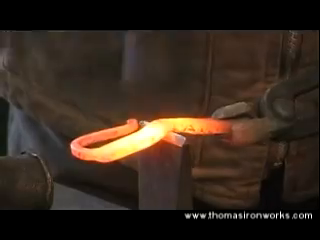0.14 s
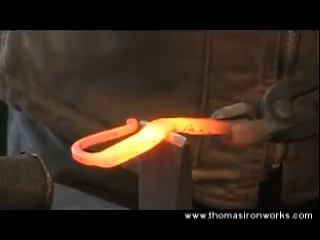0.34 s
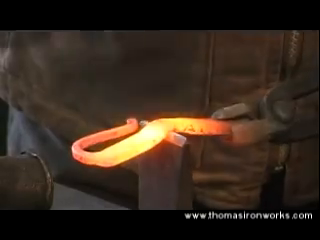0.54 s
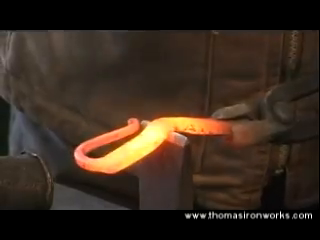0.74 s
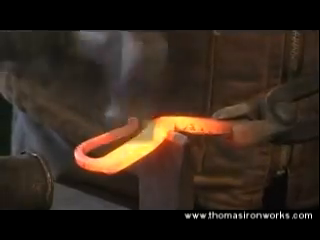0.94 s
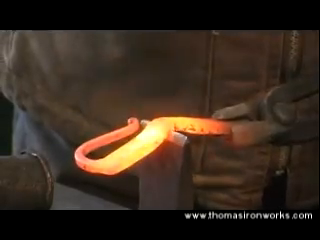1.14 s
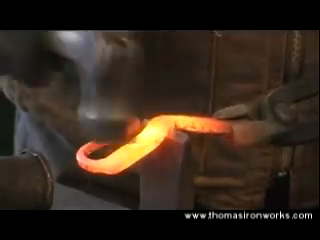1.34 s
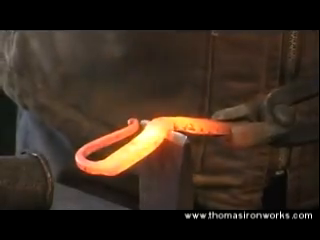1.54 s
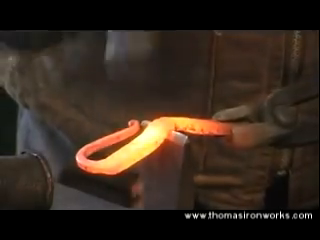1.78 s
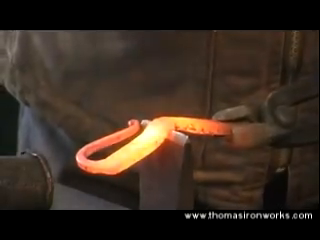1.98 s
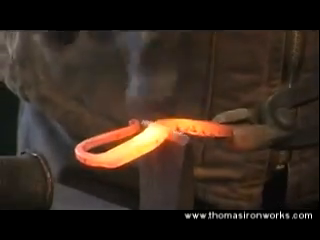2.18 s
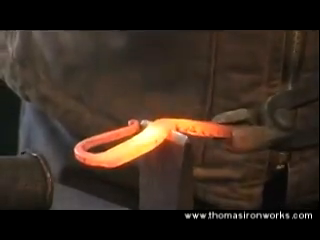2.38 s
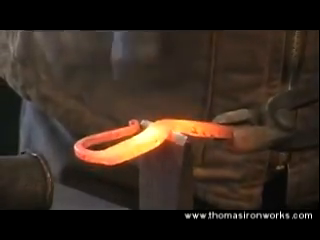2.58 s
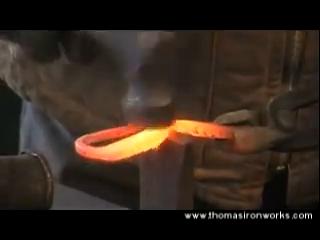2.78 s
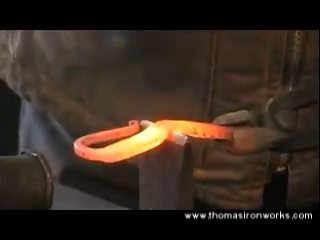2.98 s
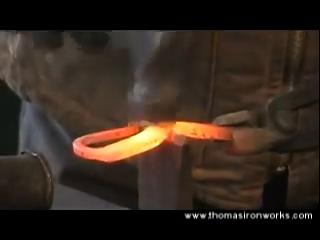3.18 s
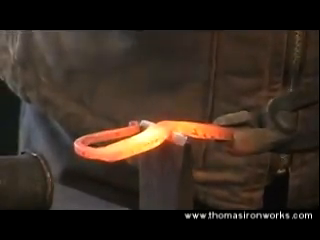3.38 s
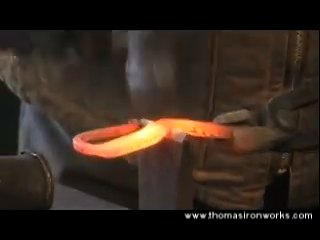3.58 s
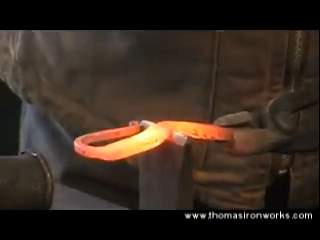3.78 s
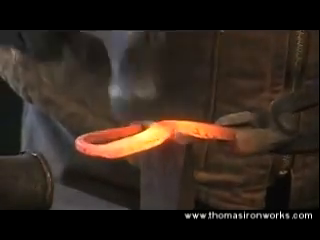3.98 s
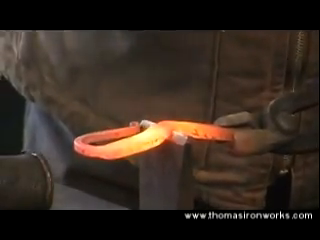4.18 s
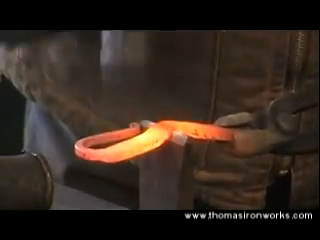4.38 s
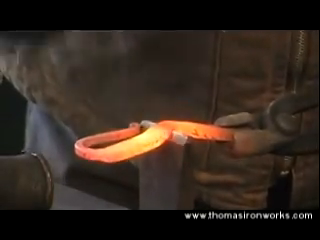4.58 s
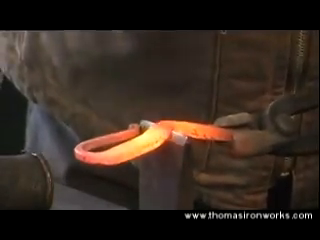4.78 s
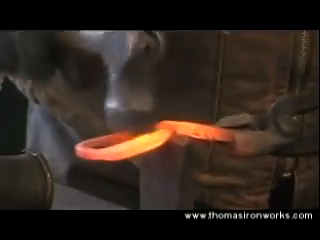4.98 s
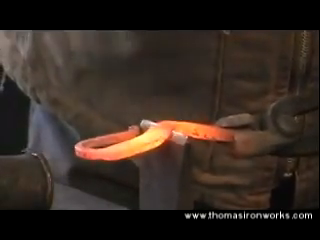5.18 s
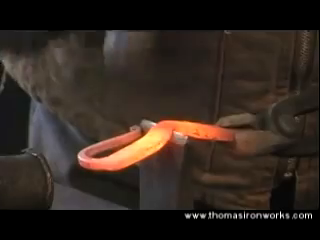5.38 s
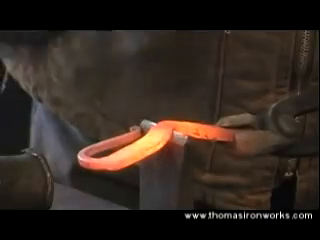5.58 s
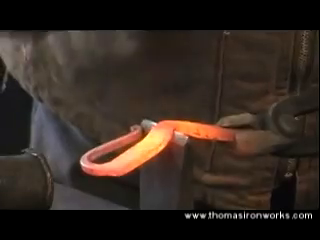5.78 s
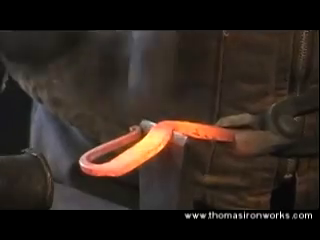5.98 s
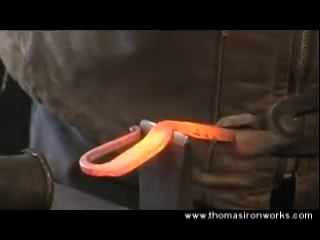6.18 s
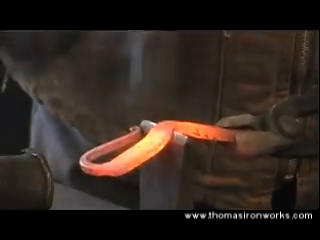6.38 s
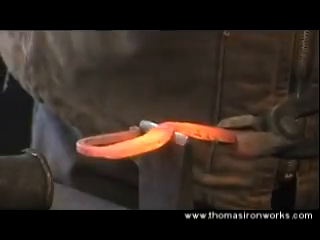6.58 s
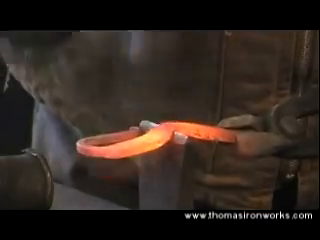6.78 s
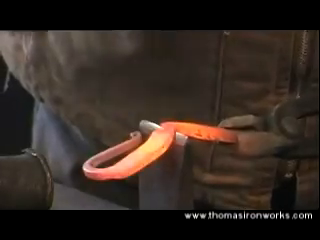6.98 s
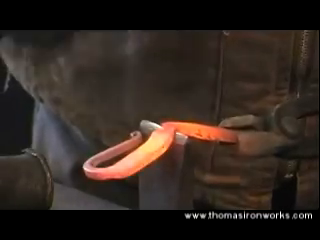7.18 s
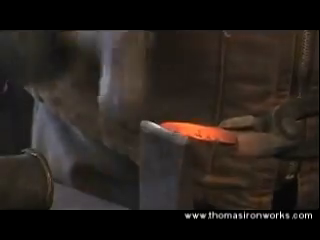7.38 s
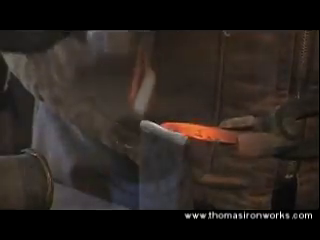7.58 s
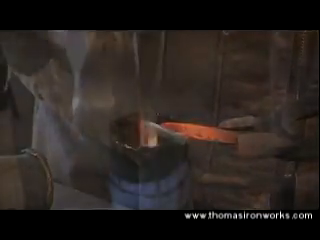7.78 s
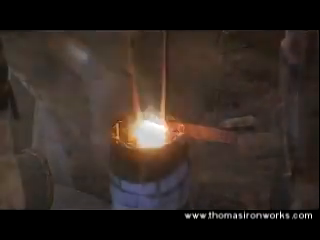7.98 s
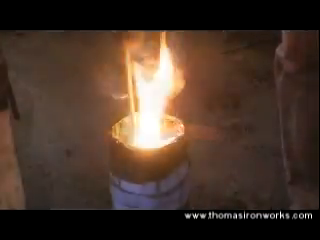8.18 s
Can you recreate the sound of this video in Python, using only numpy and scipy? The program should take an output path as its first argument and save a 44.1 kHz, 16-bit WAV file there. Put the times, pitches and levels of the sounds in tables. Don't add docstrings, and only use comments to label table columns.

```python
import sys
import numpy as np
from scipy import signal
from scipy.fft import rfft, irfft, next_fast_len
from scipy.io import wavfile
from scipy.ndimage import uniform_filter1d, minimum_filter1d

SR = 44100
rng = np.random.default_rng(int(sys.argv[2]) if len(sys.argv) > 2 else 0)


def wrap_up_sound(samples):
    columns = np.atleast_2d(samples).T
    tamed = np.clip(columns, -1, 1)
    steps = np.round(tamed * 32767).astype(np.int16)
    wavfile.write(sys.argv[1], SR, steps)


def to_linear_factor(level_db):
    exponent = np.asarray(level_db, float) / 20
    return 10 ** exponent


N = 363825
TIME = np.arange(N) / SR

# (time [s], force [dB], thump into the stand [dB], brightness of the contact [dB])
BLOWS = [(0.206, 1.5, 7, 4), (0.617, 1, 6.5, 3.5), (0.99, 0, -1.5, 4.2), (1.353, 0.5, -3, -1),
         (1.706, 3.5, 5.5, 4.5), (2.133, 4.5, 8, 5), (2.493, 4.5, 3, 5.5), (2.813, 3.5, 11, 6.5),
         (3.137, 4, 11, 6), (3.589, 3, 8, 5.5), (3.978, 4.5, 13.5, 7), (4.341, 1.5, 6.5, 6),
         (4.661, -0.3, 1, 3.5), (4.98, 0, -1.5, 3), (5.328, 0.4, -7.5, -1.5), (5.664, -3, -19.5, -2),
         (6.046, 0.5, -5.5, -0.8), (6.445, -0.8, 4.5, 2), (6.851, -1.5, -7, -2.5), (7.271, -7, -1.1, 0)]
# (time [s], thud [dB], clank [dB], edge [dB], brightness [dB])
KNOCKS = [
    (7.747, -23, -14, -16.5, -29.5),
    (7.886, -21, -17, -57, -48),
    (7.92, -22, -35, -39, -30.5),
    (8.243, -23, -31, -40, -60),
]
CONTACTS = BLOWS + KNOCKS
# (horn [dB], face [dB], edge [dB], ring length [factor])
RINGS = [(5, 0, 9, 1.18), (7, 1.5, 7.5, 1.2), (2, -1, 3, 1.08), (4, -9.5, -3, 1.3), (-0.2, -4, 0, 0.98),
         (-2.5, 4, 5.5, 1.14), (1.8, 3, 5.5, 0.98), (2.5, 10.5, 12, 1.12), (-4, 7, 14, 1.03),
         (6.5, 13, 11.5, 1.2), (-2.5, 6, 13.5, 1.07), (1.5, -6.5, -2.5, 0.81), (-6.5, -7, 2.5, 0.96),
         (-5.5, -7.5, -1.5, 0.86), (-8.5, -20, -4.5, 1.3), (1.5, -4, -1, 1.22), (3, -7, -1.5, 0.84),
         (-4.5, -6, 2.5, 1.2), (-3.5, -11, -3.5, 1.1), (-12, -3, -1.5, 1.45)]
# thump, body, force, edge, brightness, top [Hz]
COLOUR_HZ = (60, 260, 900, 1850, 5000, 11000)


def rings():
    # (frequency [Hz], ..)
    mode_hz = [
        [2305.2, 2348.2, 2499.5, 2734.5],
        [4198.5, 4043],
        [4952.6, 5502.5],
        [5834.4, 6078],
        [6577, 6837],
        [8215.5, 8624],
        [4924.5],
    ]
    # (level at 0.21 s [dB], t60 [s], echo swell [dB], swell peak [s], swell width [s],
    # swell beat [Hz])
    mode_decay = [
        [(-55.5, 0.59, -4.5, 0.098, 0.043, 10), (-79.5, 0.33, 2.5, 0.054, 0.05, 52),
         (-68.5, .6, -6.5, 0.059, 0.039, 3.6), (-77, 0.46, 18.5, 0.012, 0.019, 15)],
        [(-71, 0.37, -8, 0.028, 0.011, 9), (-92.5, 0.24, -8, 0.038, 0.014, 9)],
        [(-59.5, 0.62, -10, 0.09, 0.04, 1), (-78, .85, -3, 0.052, .03, 4)],
        [(-69, 1.37, -16, .08, .03, 12), (-77.5, 0.66, -9.5, 0.076, .03, 7.9)],
        [(-72.5, 0.6, -9, 0.011, 0.026, 7), (-83.5, 0.42, -12, 0.06, 0.018, 8)],
        [(-94, 1, -6, 0.092, .03, 9), (-106, 0.37, 1.5, 0.046, .03, 7)],
        [(-65.5, 0.45, -1.5, 0.076, .03, 4.4)],
    ]
    # (offset [dB], shares of brightness, horn, face and edge [dB per dB])
    follow = [
        (-1.5, 0.64, -0.25, 0.28, 0.037),
        (-3.5, 0.25, -.4, 0.7, 0.11),
        (2.5, 0.3, .05, .3, 0.96),
        (-9.5, 0.0039, -.1, 0.27, 0.34),
    ]
    build_s = (0.035, 0.013, 0.024, 0.0075, 0.0036, 0.014, .02)
    fade_db = (68, 27, 40, 1.5, 41, 9.1, 16)
    lesser_db = (-.3, 1.5, .7, 1.6, -2, -3, 0)
    blur_share = (0.91, 1, .15, .7, 0.55, .7, .5)
    grip_share = (0.19, 0.44, 2, .4, .6, .4, .9)
    last_end_s, release_s = 7.735, 0.004
    leftover_db = -87

    out = np.zeros(N)
    ends = [blow[0] for blow in BLOWS[1:]] + [last_end_s]
    for (start, _, _, bright), end, (horn, face, edge, grip) in zip(BLOWS, ends, RINGS):
        t = np.arange(0, end - start + release_s, 1 / SR)
        waist, heel, tip, twin = np.dot(follow, (1, bright, horn, face, edge))
        blur = np.exp(-t / 0.11)
        damping = np.clip((t[-1] - t) / release_s, 0, 1)
        for k, family_db in enumerate((horn, waist, face, edge, heel, tip, twin)):
            envelope = (1 - np.exp(-t / build_s[k])) * damping
            grip_factor = grip ** grip_share[k]
            for j, (hz, decay) in enumerate(zip(mode_hz[k], mode_decay[k])):
                db, t60, swell_db, peak, width, beat_hz = decay
                phase, spread = rng.uniform(0, 2 * np.pi), rng.standard_normal()
                swell = to_linear_factor(swell_db + 1.3 * spread) * np.exp(-0.5 * ((t - peak) / width) ** 2)
                echo = 1 + swell * np.exp(2j * np.pi * beat_hz * (t - peak))
                echo += blur_share[k] * blur * scatter(t, 0.0134)
                tone = (echo * np.exp(2j * np.pi * hz * t + 1j * phase)).real
                level_db = db + family_db + (j > 0) * lesser_db[k]
                level_db = level_db - 60 * (t - 0.21) / (t60 * grip_factor)
                level_db -= fade_db[k] * (t ** 2 - 0.22 ** 2)
                add(out, start, to_linear_factor(level_db) * tone * envelope)
    before = TIME[TIME < BLOWS[0][0]]
    add(out, 0, to_linear_factor(leftover_db - 27 * before) * np.sin(2 * np.pi * mode_hz[3][0] * before))
    return out


def strikes():
    out = np.zeros(N)
    t = np.arange(int(0.12 * SR)) / SR
    dull = signal.butter(3, 3000, fs=SR, output="sos")
    for k, contact in enumerate(CONTACTS):
        noise = rng.standard_normal(len(t))
        detune, polarity = rng.standard_normal(2)
        crack = signal.sosfilt(dull, noise * np.exp(-t / 0.0046))
        thump_hz = 75 * (1 + 0.19 * detune)
        thump = np.sign(polarity) * np.sin(2 * np.pi * thump_hz * t) * np.exp(-t / 0.015)
        knock_db = 1 * (k >= len(BLOWS))
        add(out, contact[0] - 0.0008, to_linear_factor(-16.5 + colour_db(k, 1600) + knock_db) * crack)
        add(out, contact[0] - 0.002, to_linear_factor(-26 + colour_db(k, COLOUR_HZ[0])) * thump)
    return out


def clank():
    # (frequency [Hz], level [dB], t60 [s])
    modes = [(627, -36, 0.33), (735, -32.5, 0.23), (821, -39.5, 0.43), (913, -29, .31), (999, -27, 0.2),
             (993, -45, 0.15), (1100, -40, 0.32), (1434, -39.5, 0.39), (1780, -48, 0.15), (3989, -57, .15),
             (4596, -41, 0.23), (5750, -47, 0.078), (6500, -59.5, 0.23), (7580, -69.5, 0.31),
             (11000, -65, 0.15), (12100, -85, 0.19)]
    rattle_offset_db, rattle_per_force = -1.16, -0.28
    knock_rattle_db = -10.5

    out = np.zeros(N)
    t = np.arange(int(0.33 * SR)) / SR
    attack = 1 - np.exp(-t / 0.00087)
    release = np.clip((t[-1] - t) / 0.046, 0, 1)
    for k, contact in enumerate(CONTACTS):
        rattle_db = rattle_offset_db + rattle_per_force * np.clip(colour_db(k, 1300), -5, 5)
        rattle_db += knock_rattle_db * (k >= len(BLOWS))
        draws = rng.standard_normal((len(modes), 3))
        for (hz, db, t60), (uneven, detune, phase) in zip(modes, draws):
            level = to_linear_factor(db + colour_db(k, hz) + rattle_db + 1.47 * uneven - 60 * t / t60) * attack
            turns = hz * (1 + 0.00815 * detune) * t + phase
            tone = (1 + 1.25 * scatter(t, 0.01214)) * np.exp(2j * np.pi * turns)
            add(out, contact[0], level * tone.imag * release)
    return out


def shimmer():
    # (frequency [Hz], level [dB])
    thicket = [(5200, -62.5), (6500, -58.5), (8500, -69.5), (12300, -80.5)]
    # (frequency [Hz], level [dB], t60 [s])
    last_cut = [(6360, 5.5, 0.2), (6460, -12, 0.22), (6869, -12, 0.25), (7547, -5, 0.18)]
    t60_s, spread_db, last_cut_db = 0.26, 4.5, -41

    out = np.zeros(N)
    t = np.arange(int(0.25 * SR)) / SR
    thicket_hz, thicket_db = np.transpose(thicket)
    hz = np.geomspace(thicket_hz[0], thicket_hz[-1], num=36) * rng.uniform(0.98, 1.02, 36)
    base_db = np.interp(np.log(hz), np.log(thicket_hz), thicket_db)
    envelope = (1 - np.exp(-t / 0.0023)) * np.clip((t[-1] - t) / 0.05, 0, 1)
    column_hz = hz[:, None]
    for k, blow in enumerate(BLOWS):
        uneven, lasting, phase = rng.standard_normal((3, len(hz), 1))
        level_db = (base_db + colour_db(k, hz))[:, None] + spread_db * uneven
        mode_t60 = t60_s * to_linear_factor(1.1 * lasting) * (hz[0] / column_hz) ** 0.37
        turns = column_hz * t + phase + 0.052 * scatter(t, 0.012).real * uneven
        modes = to_linear_factor(level_db - 60 * t / mode_t60) * np.sin(2 * np.pi * turns)
        add(out, blow[0], envelope * modes.sum(0))
    for cut_hz, db, t60 in last_cut:
        level = to_linear_factor(last_cut_db + db - 60 * t / t60)
        add(out, BLOWS[-1][0], envelope * level * np.sin(2 * np.pi * cut_hz * t))
    return out


def answer():
    # (frequency [Hz], level [dB], early t60 [s], late share [dB], late t60 [s], rise [s])
    bands = [(53.8, -36, 0.18, -14.5, .4, 0.0029), (130.6, -30.5, 0.21, -21.5, 1, 0.00097),
             (257.4, -27.5, 0.3, -14.5, 0.47, 0.0016), (421.6, -63, 0.087, -23, 0.18, .003),
             (950, -29, 0.37, -4, 0.15, 0.0016), (1412, -32, 0.34, -9.5, 0.23, 0.0047),
             (2390, -32.5, 0.27, -31, 0.9, 0.00026), (3300, -35, 0.27, -28, 0.1, 0.00092),
             (5640, -46, 0.31, -16.5, 0.37, 0.0051), (6480, -52, 0.24, -19, 0.2, 0.00056),
             (8270, -66, 0.24, -20.5, 1, .001), (11200, -65.5, 0.15, -11.5, .3, 0.001113)]
    out = np.zeros(N)
    t = np.arange(int(0.6 * SR)) / SR
    centres = np.log([band[0] for band in bands])
    for k, (hz, db, t60, late_db, late_t60, rise) in enumerate(bands):
        decay = to_linear_factor(-60 * t / t60) + to_linear_factor(late_db - 60 * t / late_t60)
        shape = decay * (1 - np.exp(-t / max(rise, 1e-4)))
        level = np.zeros(N)
        for j, contact in enumerate(CONTACTS):
            add(level, contact[0], to_linear_factor(db + colour_db(j, hz)) * shape)
        only_k = np.arange(len(bands)) == k
        out += level * coloured(lambda f: np.sqrt(np.interp(f, centres, only_k)) * (f > 3))
    return out * to_linear_factor(0.98 * wobble(size=90))


def squeaks():
    # (time [s], length [s], pitch [Hz], rise at the top [Hz], level [dB])
    scrapes = [
        (6.6, .24, 1165, 60, -57),
        (6.64, .2, 2600, 40, -67),
        (7.875, .045, 1000, 10, -45),
        (8.1, .12, 2150, -8, -69),
    ]
    ends_db, fuzz_hz2 = -12, 2e8
    out = np.zeros(N)
    for s, length, hz, rise_hz, db in scrapes:
        t = np.arange(0, length, 1 / SR)
        arch = np.sin(np.pi * t / length)
        fuzz = 0.17 + 0.2 * wobble(size=round(fuzz_hz2 / hz ** 2))[:len(t)]
        level = to_linear_factor(db + 9 + ends_db * (0.5 - arch))
        phase = 2 * np.pi * np.cumsum(hz + rise_hz * arch) / SR
        add(out, s, level * fuzz * np.sin(phase))
    return out


def forge():
    # (time [s], share of full level [0-1])
    forge_share = [
        (7.5, 0.2),
        (7.67, 0.27),
        (7.76, 0.85),
        (7.9, 0.66),
        (8.05, 0.84),
        (8.25, 0.9),
    ]
    # (frequency [Hz], density [dB per Hz])
    spectra = [
        [(20, 6), (60, -4), (300, 0.5), (420, -19), (800, -65)],
        [(250, -35), (450, -5), (700, -1), (1200, -4), (1700, -14.5), (2600, -29), (5000, -52)],
        [(1200, -40), (1900, 2), (3000, -3), (4500, -18), (7000, -26), (10000, -33)],
    ]
    # (time [s], rumble [dB], roar [dB], jet [dB])
    flares = [
        (7.62, -11, -1, 7),
        (7.95, .3, 8, 14.5),
        (8.19, 0, 7, -2),
        (8.25, -7, 6.5, -2),
    ]
    # level at full share, and its fall at zero share [dB]
    full_db, range_db = (-39, -53.5, -69), (18, 12, 9.5)
    flare_rise_s, flare_fall_s = 0.017, 0.056

    share = np.interp(TIME, *np.transpose(forge_share))
    levels_db = np.array(full_db)[:, None] - np.outer(range_db, 1 - share)
    for s, *flare_db in flares:
        width = np.where(TIME < s, flare_rise_s, flare_fall_s)
        levels_db += np.outer(flare_db, np.exp(-((TIME - s) / width) ** 2))
    fade_in = np.clip((TIME - forge_share[0][0]) / 0.09, 0, 1)
    flutter = to_linear_factor(1.3 * wobble(size=400))
    flame = sum(to_linear_factor(db) * shaped(points) for db, points in zip(levels_db, spectra))
    return fade_in * flutter * flame


def camera():
    # (frequency [Hz], density [dB per Hz])
    hiss_points = [(20, -0.5), (180, 1), (300, -6.5), (400, -14), (500, -21.5), (890, -14), (1300, -21.5),
                   (1900, -30.5), (3400, -45.5), (5000, -48.5), (8000, -76), (13000, -89)]
    # (frequency [Hz], level [dB rms])
    motor_lines = [
        (299.7, -55),
        (599.4, -70),
        (899.1, -71),
        (1198.8, -83),
    ]
    hiss_db = -50
    field_hz, first_pulse_s, first_tick_s = 60 / 1.001, 0.0113, 0.746

    out = to_linear_factor(hiss_db) * shaped(hiss_points)
    for hz, db in motor_lines:
        level = to_linear_factor(db + 3.5 + 3.0 * wobble(size=2000))
        out += level * np.sin(2 * np.pi * (hz * TIME + rng.random()))
    u = np.arange(-200, 500) / SR
    pulse = np.cos(2 * np.pi * 210 * u) * np.exp(-(u / np.where(u < 0, 0.0016, 0.0035)) ** 2)
    starts = np.arange(first_pulse_s, N / SR, 1 / field_hz) + u[0]
    for k, s in enumerate(starts):
        uneven_db = 5.3 * np.clip(rng.standard_normal(), -2, 1.3)
        add(out, s, to_linear_factor(-44.5 + 5.5 * (k % 2) + uneven_db) * pulse)
    tick = -np.cos(2 * np.pi * 120 * u) * np.exp(-(u / 0.003) ** 2)
    tick *= np.clip((u - u[0]) / 0.002, 0, 1)
    for s in np.arange(first_tick_s, N / SR, 60 / field_hz):
        add(out, s + u[0], to_linear_factor(-26.5) * tick)
    return out


def colour_db(k, hz):
    if k < len(BLOWS):
        _, force, thump, bright = BLOWS[k]
        body = 0.2 + 0.84 * force + 0.081 * thump
        edge = -0.93 + 0.42 * force + 0.11 * thump
        top = bright + 1.7 + 0.25 * RINGS[k][1]
    else:
        _, thump, force, edge, bright = CONTACTS[k]
        body, top = thump, bright
    return np.interp(np.log(hz), np.log(COLOUR_HZ), (thump, body, force, edge, bright, top))


def scatter(t, step):
    knots = np.arange(0, t[-1] + 2 * step, step)
    re, im = rng.standard_normal((60, 2))[:len(knots)].T
    return np.interp(t, knots[:len(re)], re) + 1j * np.interp(t, knots[:len(im)], im)


def shaped(points):
    hz, db = np.transpose(points)
    return coloured(lambda f: to_linear_factor(np.interp(f, np.log(hz), db, right=-120)))


def coloured(gain):
    size = next_fast_len(N)
    log_hz = np.log(np.fft.rfftfreq(size, 1 / SR) + 1)
    spectrum = rfft(rng.standard_normal(size)) * gain(log_hz)
    return evened(irfft(spectrum, size)[:N])


def wobble(size):
    once = uniform_filter1d(rng.standard_normal(N), size)
    return evened(uniform_filter1d(once, size))


def evened(x):
    return x / np.sqrt(np.mean(x ** 2) + 1e-20)


def add(mix, s, sound):
    part = mix[round(s * SR):][:len(sound)]
    part += sound[:len(part)]


def scene():
    ring = rings()
    mono = ring + strikes() + clank() + shimmer() + answer() + squeaks() + forge() + camera()
    return mono + to_linear_factor(-39.5) * np.outer([1, -1], np.roll(ring, 5))


def low_pass(x):
    return signal.sosfilt(signal.butter(12, 12530, fs=SR, output="sos"), x)


def record(dry):
    lowpass = signal.firwin(255, 12450, window=("kaiser", 8), fs=SR)
    dry = signal.oaconvolve(dry, lowpass[None], "same")
    peak = -minimum_filter1d(-abs(dry).max(0), size=201)
    over_db = np.maximum(20 * np.log10(peak + 1e-9) + 19, 0)
    recovery_db = 150 * TIME
    held_db = np.maximum.accumulate(over_db + recovery_db) - recovery_db
    reduction_db = 0.32 * uniform_filter1d(held_db, size=201)
    mix = dry / to_linear_factor(reduction_db) + 0.00082
    return low_pass(mix)


dry = scene()
out = record(dry)
wrap_up_sound(out)
```